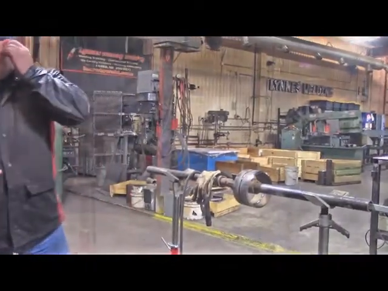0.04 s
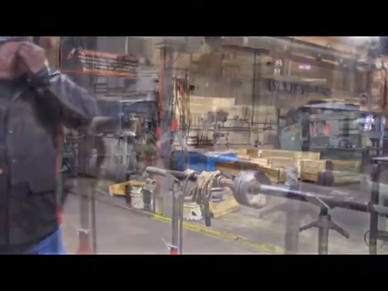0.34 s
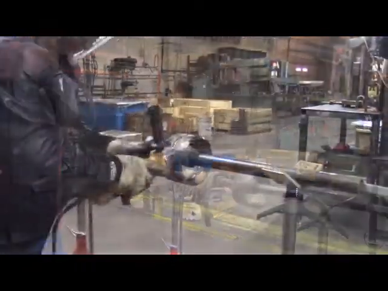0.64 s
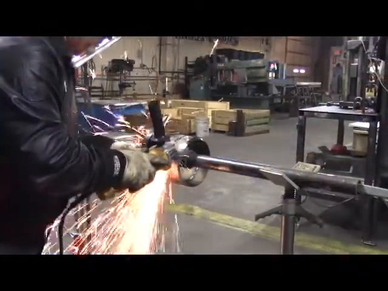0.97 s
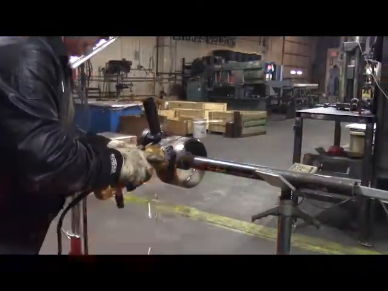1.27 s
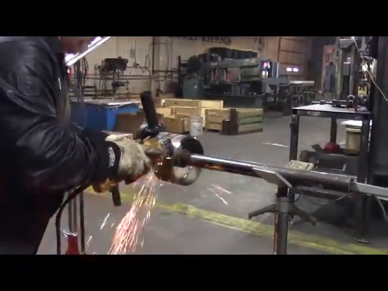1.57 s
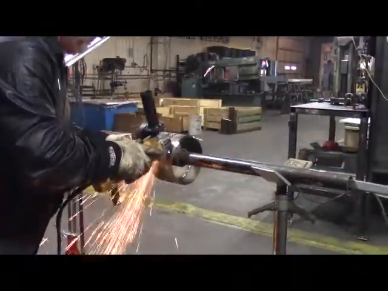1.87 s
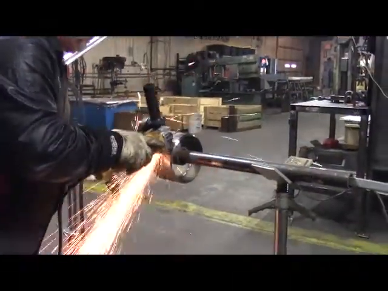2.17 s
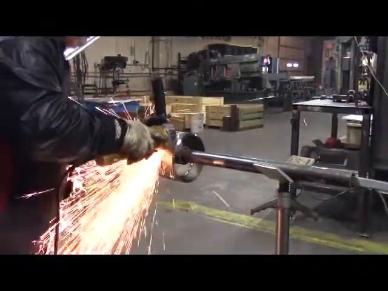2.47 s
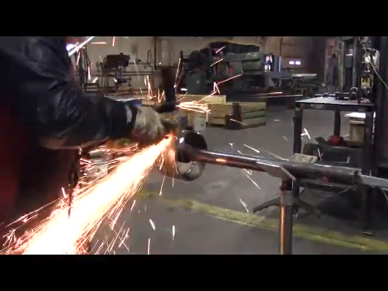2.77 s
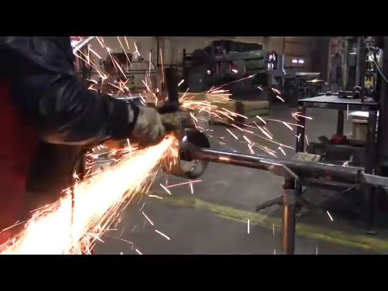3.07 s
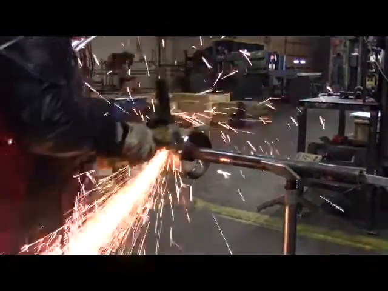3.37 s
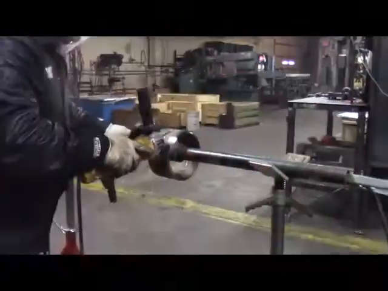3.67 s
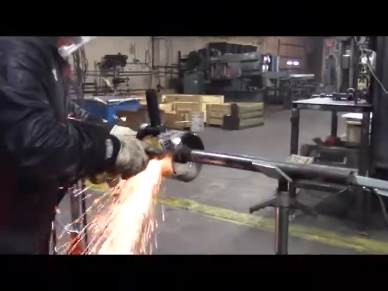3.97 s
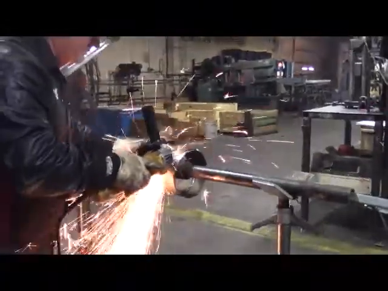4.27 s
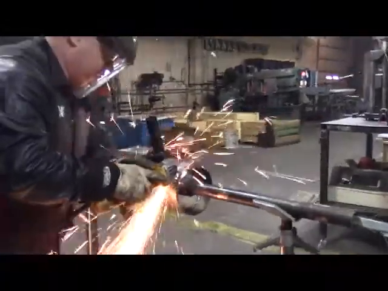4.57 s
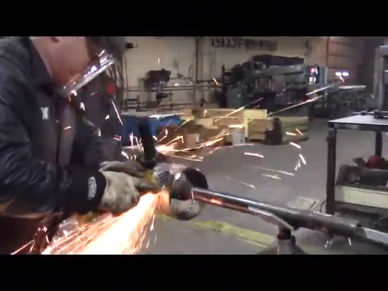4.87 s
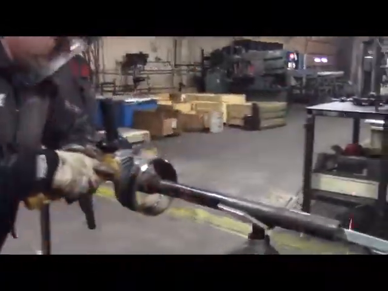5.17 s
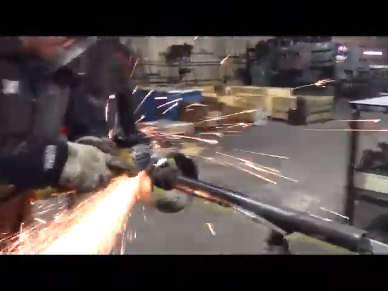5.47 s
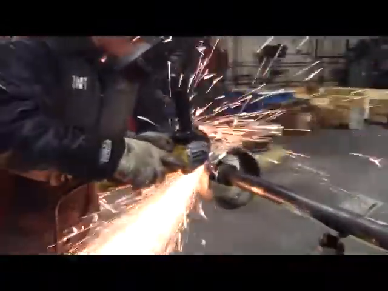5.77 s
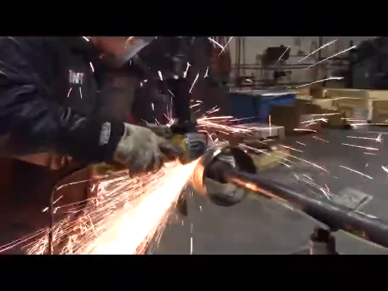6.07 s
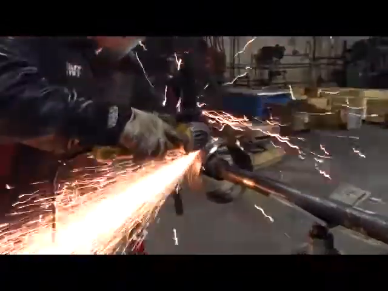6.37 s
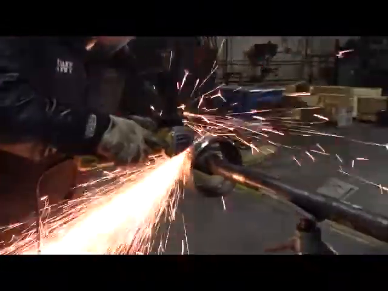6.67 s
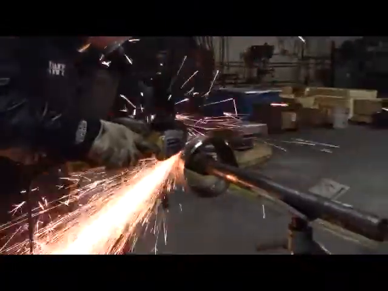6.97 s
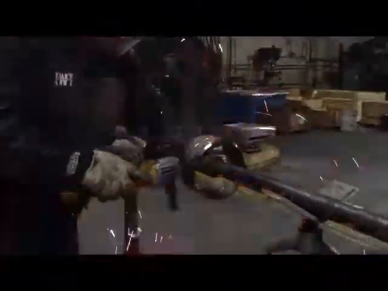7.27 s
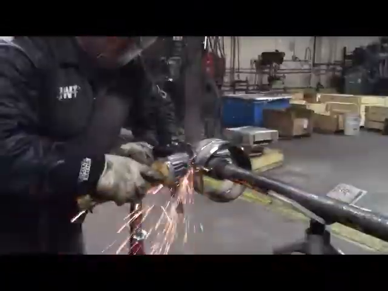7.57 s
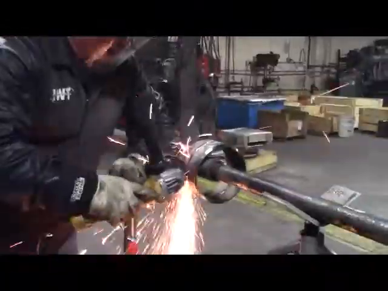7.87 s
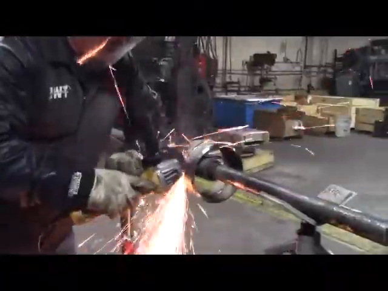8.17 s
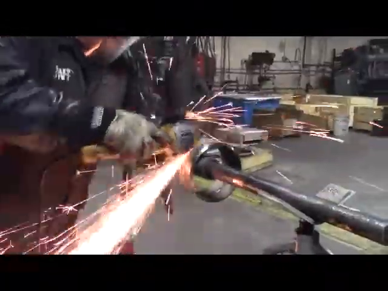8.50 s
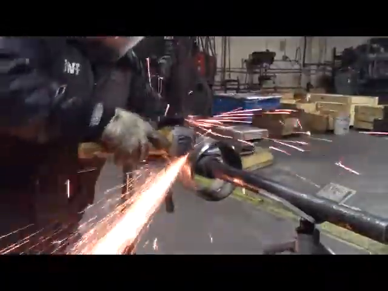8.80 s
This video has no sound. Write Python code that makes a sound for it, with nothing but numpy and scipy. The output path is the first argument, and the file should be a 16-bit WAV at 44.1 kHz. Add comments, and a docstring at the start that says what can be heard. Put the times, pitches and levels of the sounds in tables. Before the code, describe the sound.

It opens with a quiet workshop hum of machines and one sharp, hard clack at about 0.1 seconds. At 0.4 seconds the sound cuts out for an instant, and an angle grinder is suddenly at work on a steel pipe nearby. At first the contact is light: a loud, gritty hiss over rushing fan air and a high motor whine. From about 2.5 seconds the disc is pressed harder, the whine sinks, and the rasp turns harsher, with chatter, screeching and thin high ringing from the steel. The grinder is briefly eased off at about 3.4, 5 and 7.2 seconds; each time the scraping dips and the whine climbs before the disc bites again. The heaviest grinding comes around 3 seconds, from 5.7 to 7.2 seconds, and from about 8 seconds until the end at 9 seconds.

```python
"""A workshop: machines hum, something hard clacks; after a sudden cut, an angle grinder works a pipe weld.
The disc's grit scrapes a partly repeating pattern on every turn, over motor whine and fan air.
Pressed harder, the motor slows, the disc bumps harder twice a turn and the steel rings.
The grinder is eased off three times, and its whine climbs again."""
import sys
import numpy as np
from scipy import signal
from scipy.fft import rfft, irfft, next_fast_len
from scipy.io import wavfile
from scipy.ndimage import uniform_filter1d, minimum_filter1d, map_coordinates

SR = 44100
rng = np.random.default_rng(int(sys.argv[2]) if len(sys.argv) > 2 else 0)


def wav_record(signal):
    """Record a signal, one row per channel, as 16-bit PCM in the file named by sys.argv[1]."""
    frames = np.transpose(np.atleast_2d(signal))
    bounded = np.clip(frames, -1, 1)
    # unit amplitude maps onto the largest positive 16-bit level
    quanta = np.round(bounded * 32767).astype(np.int16)
    wavfile.write(sys.argv[1], SR, quanta)


N = 398663
TIME = np.arange(N) / SR
CUT_OUT_S, CUT_IN_S = .409, .435
FREE_HZ, LOADED_HZ, TURNS_PER_WHINE = 1300, 850, .132

# Table levels are relative; the functions add their own gains.
# room noise: freq_hz, level_db
SHOP_SPECTRUM = [(24, -69), (40, -51), (120, -14), (234, -9.5), (425, -12.5), (527, -11), (701, -15.5),
                 (829, -12), (1050, -18), (1270, -17.5), (3820, -32), (8390, -47), (12000, -62),
                 (15600, -105), (22000, -120)]
# shop machines: pitch_hz, before_cut_db, after_cut_db
HUM_TONES = [(135.7, -37, -98), (270.4, -56, -59.5), (541, -42, -62)]
# two impacts of the clack: start_s, level_db
CLACK_HITS = [(0.071, -24), (0.0944, -4)]
# its ring: pitch_hz, t60_s, level_db
CLACK_MODES = [(1450, 0.014, -8), (1980, 0.026, -2.5), (2214, 0.032, 1), (3100, .008, -41),
               (3940, .008, -21), (5140, 0.012, -22)]

# hand on the disc: time_s, pressure (1 = full)
HAND_PRESSURE = [(0.44, 0.23), (1.05, 0.16), (1.65, 0.04), (2.04, 0.08), (2.47, 0.26), (2.83, 0.82),
                 (3.41, 1.03), (3.46, 0.28), (3.86, 0.03), (4.24, 0.55), (4.87, 0.48), (5.06, 0.15),
                 (5.22, 0.07), (5.85, 0.98), (6.74, 1.04), (6.89, 0.85), (7.22, 1.08), (7.27, 0.24),
                 (7.62, 0.17), (7.7, 0.59), (8.44, 0.97), (9.04, 0.8)]
# passes over the weld: touch_s, lift_s, full_chatter_db, screech_share, steel_db, rumble_db
WELD_PASSES = [(0, 3.41, -14, .2, -12, -69), (3.47, 4.96, -15.2, .6, -8, -67),
               (4.95, 7.215, -15.3, .38, -4, -70), (7.29, 9.1, -14.7, .27, -7, -65)]
# disc catches on the weld: centre_s, half_length_s, chatter_db, scrape_db, sizzle_db
DISC_CATCHES = [(0.474, 0.039, 7, 0, 0), (0.924, 0.18, 3, -0.5, 3), (1.846, 0.037, 8, 4.5, -2),
                (2.338, .025, -2, -3, 15), (2.526, 0.028, 6, 2, 15), (3.01, .08, 4.5, 0, 3),
                (3.997, 0.18, 5.5, 2.5, 14), (4.646, 0.039, 2, -2, 11), (5.23, 0.022, 14, 3, 7),
                (5.46, 0.22, 5, -0.5, 0), (6.027, 0.087, -4.5, 4.5, 1), (6.872, 0.15, 4.5, 2.5, 3),
                (7.126, 0.057, 1.5, 3.5, -5), (8.566, 0.015, 0, -14, 13), (8.92, .08, 1.5, 1, 0)]
# resonances of disc, guard and pipe: pitch_hz, width_hz, gain_db
CHATTER_MODES = [(3020, 750, -7.5), (3702, 250, 7.5), (3895, 110, 8.5), (4046, 120, 3.5)]
SCRAPE_MODES = [(4900, 90, -13), (5600, 90, 6.5), (6850, 38, 17), (7020, 110, 6.5), (8370, 110, 3)]
SIZZLE_MODES = [(10620, 61, 10.3), (11250, 33, 10)]
# screech harmonics: bump_rate_multiple, level_db
SCREECH_HARMONICS = [(11, -8), (12, -4), (13, 0), (14, -2), (15, 2), (16, -3), (17, 0), (18, -1), (19, 1),
                     (20, -3), (21, -6), (25, -8), (35, -8), (37, -7), (38, -7), (40, -8)]
# how well the steel radiates them: freq_hz, gain_db
STEEL_RADIATION = [(2800, -14), (3400, -6), (3750, 0), (4150, 2), (4500, -4), (4900, -14), (5250, -9),
                   (6000, -16), (10400, -3), (11500, -14)]
# spectra of scrape, sizzle, fan air and loaded roar: freq_hz, level_db
SCRAPE_SPECTRUM = [(2100, -35.5), (2700, -4), (4500, 3), (5800, 5.5), (6400, 4), (7200, 2.5), (7900, -0.5),
                   (8700, -1), (11000, -3)]
SIZZLE_SPECTRUM = [(7000, -35.5), (9000, -4), (10200, 10), (11300, 12), (12000, -62), (13000, -22)]
FAN_SPECTRUM = [(25, -40), (150, -57), (300, -13.5), (430, -18), (760, -9.5), (980, 2.5), (1180, -9.5),
                (1400, -2), (1680, 3), (1800, -3), (1925, 6.5), (2120, 0.5), (2600, 3), (6000, -9)]
ROAR_SPECTRUM = [(25, -54), (330, -28.5), (490, -14.5), (600, -16), (880, -7.5), (1100, -11.5),
                 (1290, -4.5), (1430, -6), (1650, -1.5), (1920, -2.5), (2130, -11), (2650, 0), (3200, 2),
                 (5500, -22)]
# level curves of scrape, sizzle, rush and whine: time_s, level_db
SCRAPE_LEVEL = [(.95, -11.5), (1.25, -16.5), (2.1, -15), (3.3, -20), (4, -16), (4.7, -20), (5.4, -16),
                (6.1, -20), (6.65, -22), (7.05, -18), (8.1, -15.5), (9.04, -18)]
SIZZLE_LEVEL = [(.55, -16), (1.4, -22.5), (2.6, -20), (3.4, -17), (4, -28.5), (4.3, -27), (5.35, -16.5),
                (6.3, -27), (7.1, -21), (7.7, -14), (8.3, -18), (9.04, -21)]
RUSH_LEVEL = [(.44, -18), (1.2, -27), (1.5, -23.5), (2.2, -24), (3.4, -31.5), (3.75, -23.5), (4.15, -28),
              (4.85, -31.5), (5.3, -24.5), (5.7, -30.5), (6.5, -29.5), (7, -25), (7.25, -30.5), (7.6, -24),
              (8.1, -26.5), (9.04, -28.5)]
WHINE_LEVEL = [(.44, -55), (1.1, -51), (1.4, -43), (2.1, -42), (2.6, -44.5), (2.95, -37), (3.4, -39.5),
               (3.55, -50), (3.95, -42), (4.65, -51), (5.35, -39), (5.7, -41), (6.7, -43.5), (7.05, -40.5),
               (7.35, -45), (7.65, -49), (7.95, -38), (9.04, -41)]
# nearby surfaces: delay_s, gain_db
ECHOES = [(.0047, -27), (.0083, -21.5), (.0131, -23), (.029, -18)]
# rubbed steel: pitch_hz, width_hz, level_db, best_pressure, favoured_pass (from 1), eased_db
SINGING_MODES = [(5565, 65, -29, 1, 3, -12), (6890, 13, -25.5, .5, 3, 0), (7050, 110, -27, .7, 3, -12),
                 (7310, 25, -32, .7, 1, -12), (9420, 42, -29, .3, 2, -12), (9640, 80, -32, .9, 4, -12),
                 (9985, 32, -30, .8, 1, -12), (10580, 120, -26, .45, 2, -12),
                 (10992, 18, -28.5, .6, 2, -12), (11340, 28, -26, .6, 1, -12)]
# further motor tones, the last from the gear teeth: whine_multiple, level_db
MOTOR_TONES = [(.528, -14), (2, -16), (4.224, 7)]


def from_db(db):
    """Decibels to gain."""
    return np.exp(np.asarray(db) * (np.log(10) / 20))


def unit_rms(x):
    """Scale to rms 1."""
    return x / np.sqrt(np.mean(x ** 2) + 1e-20)


def curves(rows):
    """Interpolate rows of (time_s, values...) to one signal per value."""
    times_s, *columns = np.transpose(rows)
    return [np.interp(TIME, times_s, column) for column in columns]


def per_pass(rows):
    """Hold one row of values through each pass."""
    return curves([(time_s, *row) for weld_pass, row in zip(WELD_PASSES, rows)
                   for time_s in weld_pass[:2]])


def drift(rate_hz):
    """Random wander, rms 1."""
    knots = rng.standard_normal(20000)
    return unit_rms(np.interp(TIME * rate_hz, np.arange(len(knots)), knots))


def colour(x, spectrum):
    """Filter by rows of (freq_hz, level_db)."""
    hz, db = np.transpose(spectrum)
    size = next_fast_len(N, real=True)
    bins_hz = np.maximum(np.arange(size // 2 + 1) * SR / size, 1)
    gain = from_db(np.interp(np.log(bins_hz), np.log(hz), db))
    return irfft(rfft(x, size) * gain, size)[:N]


def noise(spectrum):
    """Coloured noise, rms 1."""
    return unit_rms(colour(rng.standard_normal(N), spectrum))


def resonate(x, modes):
    """Parallel two-pole resonators."""
    out = 0
    for hz, width_hz, db in modes:
        radius = np.exp(-np.pi * width_hz / SR)
        scale = (1 - radius ** 2) / 2
        feedback = [1, -2 * radius * np.cos(2 * np.pi * hz / SR), radius ** 2]
        out += from_db(db) * signal.lfilter([scale, 0, -scale], feedback, x)
    return out


def machine_hum(after_cut):
    """Machines elsewhere in the shop: steady, slightly wavering tones."""
    out = 0
    for hz, before_db, after_db in HUM_TONES:
        tone = np.sin(2 * np.pi * hz * TIME + .1 * drift(12))
        out += tone * from_db(np.where(after_cut, after_db, before_db) + 1.2 * drift(6.7))
    return np.sqrt(2) * out


def clack():
    """Hard impacts in quick succession: a tiny crack, then fast-dying modes."""
    out = 0
    for start_s, level_db in CLACK_HITS:
        age_s = np.clip(TIME - start_s, 0, 1)
        ring = sum((-1) ** k * np.sin(2 * np.pi * hz * age_s) * from_db(db - 60 * age_s / t60_s)
                   for k, (hz, t60_s, db) in enumerate(CLACK_MODES))
        crack = rng.standard_normal(N) * (age_s > 0) * from_db(-29 - 60 * age_s / .015)
        out += from_db(level_db - 1.5) * (ring + crack)
    return out


def handling(inertia_s=.15, seat_s=.2, release_s=.021):
    """Hand pressure, the motor load lagging it, and how far the disc is eased off (0-1)."""
    pressure, = curves(HAND_PRESSURE)
    pole = np.exp(-1 / (inertia_s * SR))
    load = pressure[0] + signal.lfilter([1 - pole], [1, -pole], pressure - pressure[0])
    seated = sum(np.clip(np.minimum((TIME - touch_s) / seat_s, 1 - (TIME - lift_s) / release_s), 0, 1)
                 for touch_s, lift_s, *_ in WELD_PASSES)
    return pressure, np.clip(load, 0, 1), 1 - np.clip(seated, 0, 1)


def contact_levels_db(bite, eased, full_chatter_db, light_chatter_db=-22.5):
    """Chatter grows with bite; easing off lowers chatter, scrape and sizzle; catches jolt them."""
    chatter_db = light_chatter_db + (full_chatter_db - light_chatter_db) * bite
    levels_db = np.array([chatter_db - 9.5 * eased + 1.3 * drift(20),
                          curves(SCRAPE_LEVEL)[0] - 6.5 * eased + .81 * drift(18),
                          curves(SIZZLE_LEVEL)[0] - 4 * eased + 1.3 * drift(20)])
    for centre_s, half_length_s, *gains_db in DISC_CATCHES:
        triangle = np.maximum(1 - np.abs(TIME - centre_s) / half_length_s, 0)
        levels_db += np.outer(gains_db, triangle)
    return levels_db


def bumps(turns, depth_db, uneven_db=4.5):
    """Contact force: the disc lands twice a turn, never equally hard. Mean power stays level."""
    landings = 2 * turns + .06 * drift(90)
    strength = rng.standard_normal(2 ** 12)[landings.astype(int) + 1]
    regular_db = depth_db * np.cos(2 * np.pi * (landings - .5))
    force = from_db(regular_db + uneven_db * strength * np.sin(np.pi * landings) ** 2)
    return force / np.sqrt(uniform_filter1d(force ** 2, size=4096))


def grit(turns, repeat_share, memory, grains=256):
    """Rim grains strike again each turn as they wear; the rest is fresh fracture."""
    rim = signal.lfilter([1], [1, -memory], rng.standard_normal((2 ** 11, grains)), axis=0).ravel()
    pattern = unit_rms(map_coordinates(rim, [(turns + 20) * grains], order=2, mode="wrap"))
    return np.sqrt(repeat_share) * pattern + np.sqrt(1 - repeat_share) * rng.standard_normal(N)


def screech(turns):
    """Even skipping fuses the bumps into harmonics that glide through the steel's resonance."""
    bump_hz = 2 * np.gradient(turns) * SR
    landings = 2 * turns + .007 * drift(60)
    out, power = 0, 0
    for multiple, level_db in SCREECH_HARMONICS:
        radiation_db = np.interp(multiple * bump_hz, *np.transpose(STEEL_RADIATION))
        gain = from_db(level_db + radiation_db + 2.2 * drift(5) + 3.5 * drift(40))
        out += gain * np.sin(2 * np.pi * (multiple * landings + rng.random()))
        power += gain ** 2 / 2
    return out / np.sqrt(uniform_filter1d(power, size=4096))


def chatter(turns, force, screech_share):
    """Grit drives the low resonances in bursts; a share of the power is screech."""
    ringing = resonate(force * grit(turns, repeat_share=.067, memory=.914), CHATTER_MODES)
    rasp = unit_rms(colour(ringing, [(1900, -7), (2900, -6.5)]))
    return np.sqrt(1 - screech_share) * rasp + np.sqrt(screech_share) * force ** .35 * screech(turns)


def scrape(turns, force, load, steel_db):
    """Coarse grit: broad noise that gives way to ringing steel under load."""
    coarse = force ** .45 * grit(turns, repeat_share=.16, memory=.92)
    broad = colour(coarse, SCRAPE_SPECTRUM) * from_db(-2.5 * load)
    flare = from_db(2 * drift(18))
    steel = flare * resonate(grit(turns, repeat_share=.18, memory=.91), SCRAPE_MODES)
    return unit_rms(broad + steel * from_db(steel_db + 6.1 * load))


def swish(whine_cycles, whine_multiple=9.6, half_width_hz=1100):
    """Grit passing the contact hisses in a band that follows rim speed."""
    lowpass = signal.butter(2, half_width_hz, fs=SR, output="sos")
    band = signal.sosfilt(lowpass, rng.standard_normal((2, N)))
    phase = 2 * np.pi * whine_multiple * whine_cycles
    return unit_rms(band[0] * np.cos(phase) + band[1] * np.sin(phase))


def sizzle(turns, force, whine_cycles):
    """Fine grit drives the highest resonances, over the swish."""
    fine = force ** 1.1 * grit(turns, repeat_share=.6, memory=.69)
    hiss = unit_rms(colour(fine, SIZZLE_SPECTRUM) + from_db(6) * resonate(fine, SIZZLE_MODES))
    return unit_rms(hiss + from_db(-3.5) * swish(whine_cycles))


def rush(turns, force, load):
    """Fan air through housing and guard; a hollow roar replaces it under load."""
    level_db, = curves(RUSH_LEVEL)
    air = noise(FAN_SPECTRUM) * from_db(3.5)
    grains = force ** .35 * grit(turns, repeat_share=.17, memory=.842)
    roar = unit_rms(colour(grains, ROAR_SPECTRUM)) * from_db(4)
    return (np.sqrt(1 - load) * air + np.sqrt(load) * roar) * from_db(level_db + 1.02 * drift(20))


def stand_rumble(level_db, eased):
    """The pipe's stand shakes, less as the disc is eased off."""
    gain = from_db(level_db - 20 * eased + 3 * drift(12))
    return gain * noise([(25, 1), (80, -1), (200, -13), (2000, -70)])


def add_echoes(x):
    """Early echoes off floor and bench; the paths shift slightly as the tool moves."""
    sway_s = .00002 * drift(1.6)
    return x + sum(from_db(db) * map_coordinates(x, [(TIME - delay_s - sway_s * (-1) ** k) * SR], order=1)
                   for k, (delay_s, db) in enumerate(ECHOES))


def grinding(whine_cycles, pressure, load, eased, bite_pressure=.6):
    """Disc on weld: one bumping force drives chatter, scrape, sizzle and roar; the stand rumbles."""
    full_chatter_db, screech_share, steel_db, rumble_db = per_pass([row[2:] for row in WELD_PASSES])
    bite = np.clip(pressure / bite_pressure, 0, 1)
    chatter_db, scrape_db, sizzle_db = contact_levels_db(bite, eased, full_chatter_db)
    turns = whine_cycles * TURNS_PER_WHINE
    force = bumps(turns, depth_db=.5 + 2.5 * load ** 2)
    hand_tremor = from_db(.5 * drift(35))
    contact = (chatter(turns, force, screech_share * bite) * from_db(chatter_db)
               + scrape(turns, force, load, steel_db) * from_db(scrape_db)
               + sizzle(turns, force, whine_cycles) * from_db(sizzle_db - 4.5))
    return rush(turns, force, load) + stand_rumble(rumble_db, eased) + add_echoes(hand_tremor * contact)


def singing_pipe(pressure, eased, unfavoured_db=-6.5, pressure_range=.5):
    """Lightly damped modes swell and stutter; each favours its own pressure and spot on the weld."""
    stutter = from_db(2.2 * drift(26))
    rubbing = rng.standard_normal(N)
    pass_number, = per_pass([[k + 1] for k in range(len(WELD_PASSES))])
    out = 0
    for hz, width_hz, level_db, best_pressure, favoured_pass, eased_db in SINGING_MODES:
        tone = unit_rms(resonate(rubbing, [(hz, width_hz, 0)]))
        tone /= np.sqrt(uniform_filter1d(tone ** 2, size=4096) + .051)
        spot_db = unfavoured_db * np.minimum(np.abs(pass_number - favoured_pass), 1)
        swell_db = 3 * drift(5) - 6.5 * ((pressure - best_pressure) / pressure_range) ** 2
        out += tone * from_db(level_db + spot_db + swell_db + eased_db * eased)
    return out * stutter * from_db(1)


def motor(whine_cycles):
    """Whine, related motor tones and gear mesh, all wavering in phase and level."""
    level_db, = curves(WHINE_LEVEL)
    phase = 2 * np.pi * whine_cycles
    tones = np.sin(phase + .41 * drift(70)) * from_db(3 + 2.2 * drift(45))
    for multiple, db in MOTOR_TONES:
        tones += np.sin(multiple * phase + .8 * drift(50)) * from_db(db + 1.6 * drift(25))
    return np.sqrt(2) * from_db(level_db) * tones


def scene():
    """Idle shop, an instant of silence, then the grinder; both channels alike."""
    pressure, load, eased = handling()
    whine_hz = FREE_HZ + (LOADED_HZ - FREE_HZ) * load
    whine_cycles = np.cumsum(whine_hz * (1 + .0012 * drift(30) + .0025 * drift(9))) / SR
    before_cut, after_cut = TIME < CUT_OUT_S, TIME > CUT_IN_S
    shop = from_db(-32.5) * noise(SHOP_SPECTRUM) + clack()
    grinder = grinding(whine_cycles, pressure, load, eased)
    grinder += singing_pipe(pressure, eased) + motor(whine_cycles)
    mono = before_cut * shop + after_cut * grinder + (before_cut | after_cut) * machine_hum(after_cut)
    return np.array([mono, mono])


def record(dry):
    """Fast peak limiter, then a steep low-pass."""
    ceiling, cutoff_hz = .9, 11950
    gain = ceiling / np.maximum(np.abs(dry), ceiling)
    gain = uniform_filter1d(minimum_filter1d(gain, size=96), size=96)
    return signal.sosfiltfilt(signal.ellip(8, .1, 60, cutoff_hz, fs=SR, output="sos"), dry * gain)


dry = scene()
out = record(dry)
wav_record(out)
```